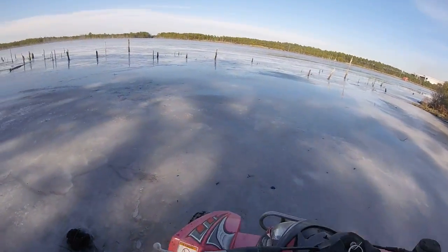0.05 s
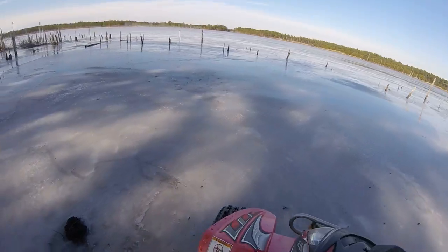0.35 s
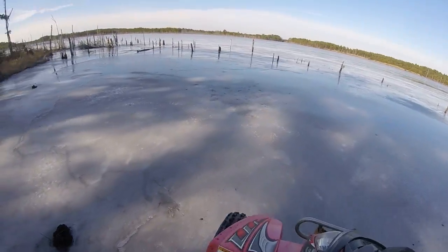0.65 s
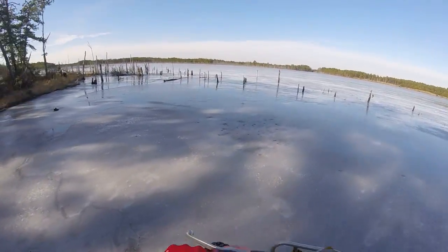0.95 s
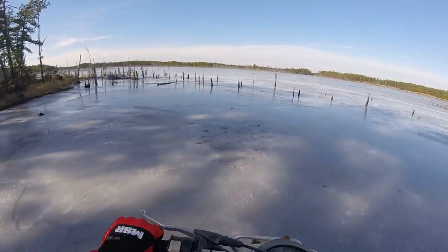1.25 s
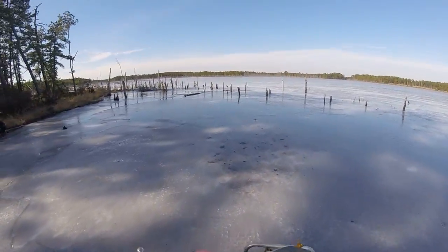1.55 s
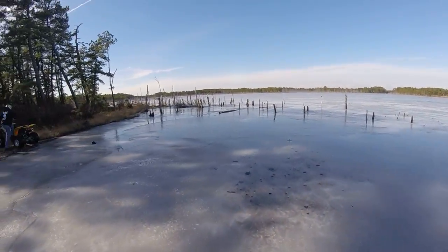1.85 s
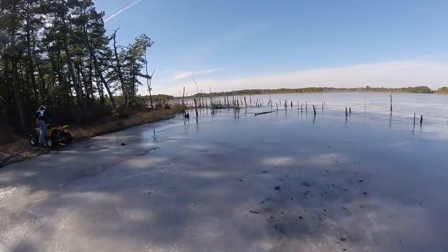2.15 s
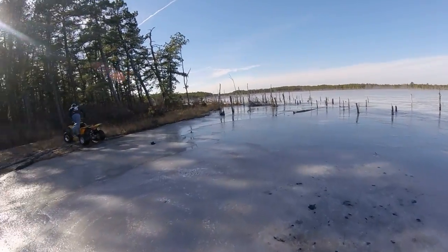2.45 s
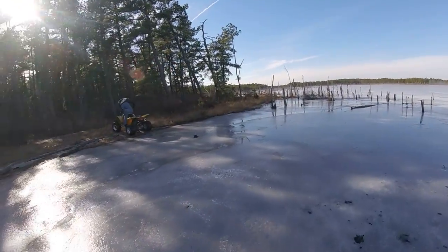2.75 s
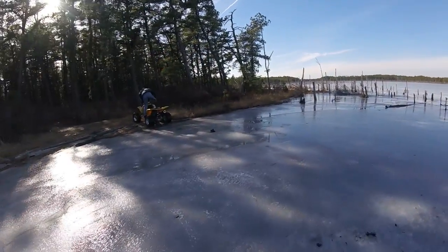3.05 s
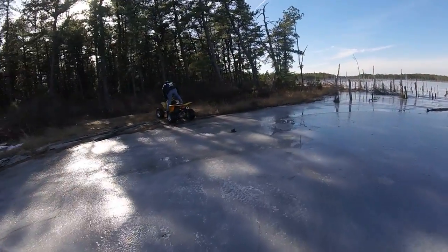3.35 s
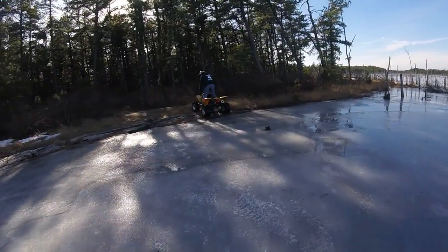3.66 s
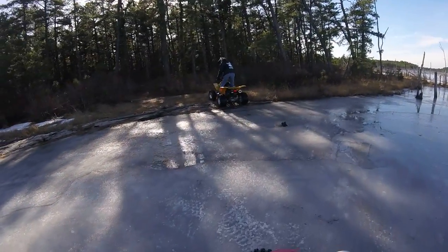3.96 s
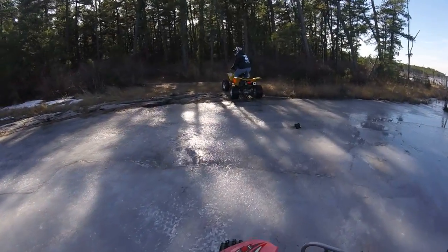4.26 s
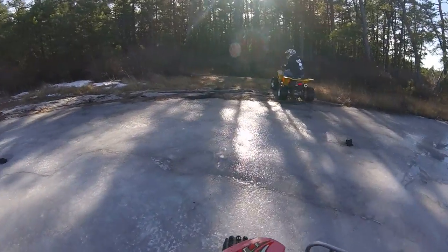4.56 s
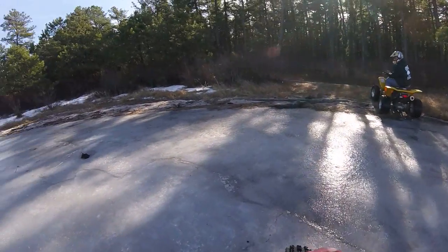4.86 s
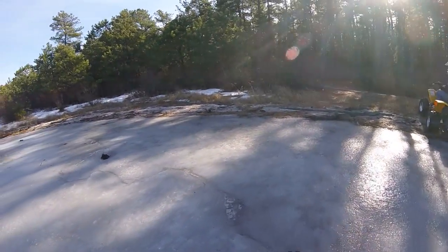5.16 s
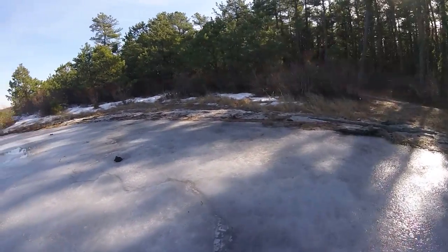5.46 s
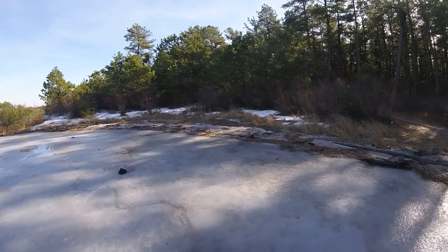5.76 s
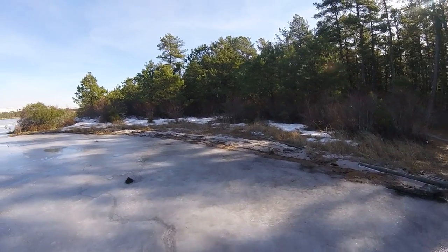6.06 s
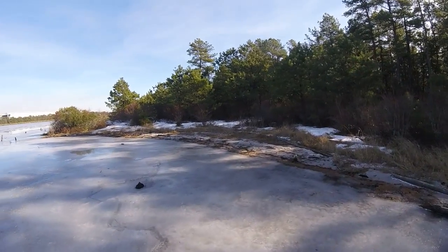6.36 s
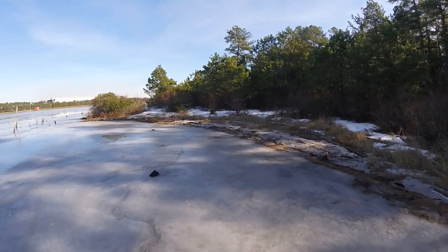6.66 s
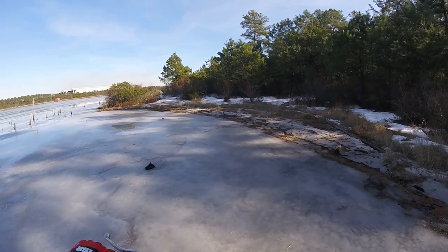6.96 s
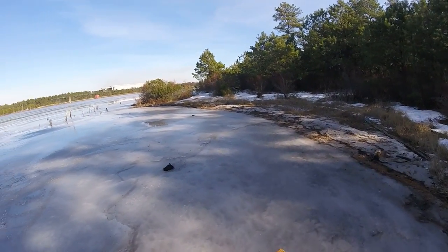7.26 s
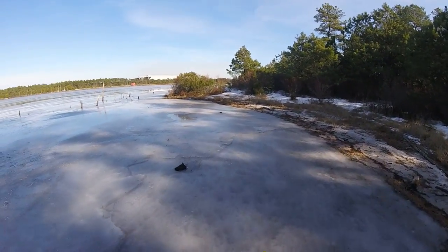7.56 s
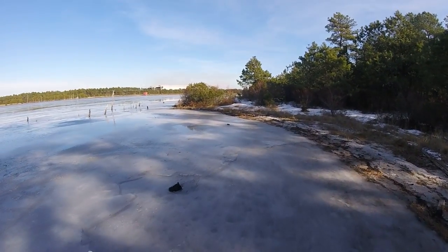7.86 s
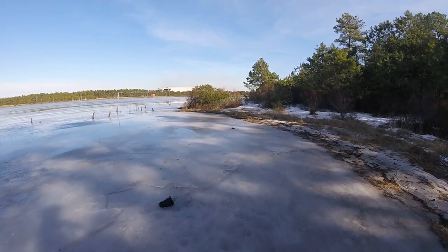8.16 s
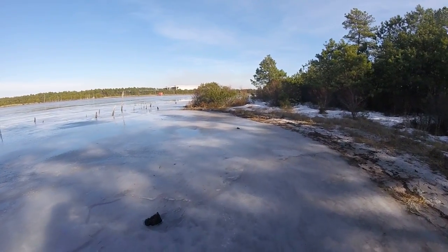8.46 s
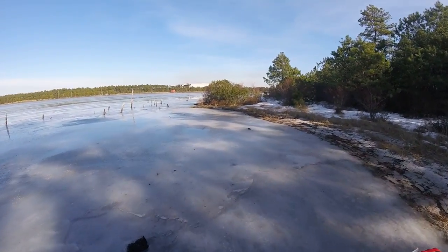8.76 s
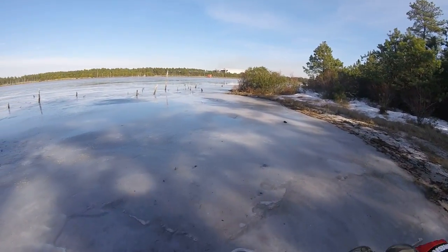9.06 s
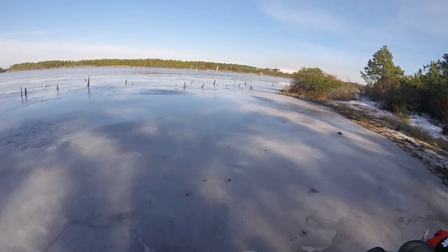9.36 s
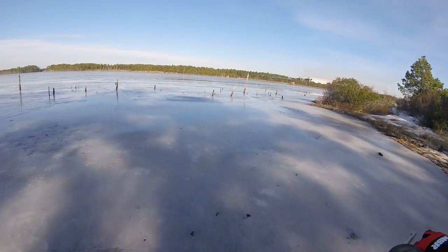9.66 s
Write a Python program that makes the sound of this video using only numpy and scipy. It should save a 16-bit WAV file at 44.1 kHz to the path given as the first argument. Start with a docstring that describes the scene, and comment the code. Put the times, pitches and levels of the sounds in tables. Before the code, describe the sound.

A quad bike's chugging engine revs up twice and drops back to idle as its tyres crunch over ice.

```python
"""On a frozen lake, a quad bike rolls along, heard from the rider's seat.
Its one-cylinder, four-stroke engine revs up twice and drops back to a chugging idle. Each firing
sends a thump of gas through the airbox and exhaust pipe, with a rush, a thin hiss and clattering
valves; an open throttle adds a growl. Below, the tyres crunch and rumble over the ice,
with a few sharp ticks and dull bumps."""
import sys
import numpy as np
from scipy import signal
from scipy.fft import rfft, irfft, next_fast_len
from scipy.io import wavfile
from scipy.ndimage import uniform_filter1d, minimum_filter1d, map_coordinates

SR = 44100
rng = np.random.default_rng(int(sys.argv[2]) if len(sys.argv) > 2 else 0)


def digitize_waveform(pressure):
    """Quantize a signal to 16-bit integers and store it at the path in sys.argv[1].

    Rows of a 2-D input are taken as channels; values are limited to [-1, 1].
    """
    field = np.atleast_2d(pressure).T
    bounded = np.clip(field, -1, 1)
    quanta = np.round(bounded * 32767).astype(np.int16)
    wavfile.write(sys.argv[1], SR, quanta)


N = 437472
T = np.arange(N) / SR

# how often the engine fires: t/s, f/Hz
FIRING_RATE = [(0.0, 18.352), (0.228, 19.558), (0.442, 23.148), (0.884, 22.525), (1.289, 19.891),
               (1.738, 15.033), (2.41, 15.304), (2.691, 14.811), (3.042, 15.434), (3.427, 15.021),
               (4.083, 15.467), (4.64, 16.664), (5.114, 16.167), (5.571, 18.937), (5.88, 23.404),
               (6.624, 22.108), (7.054, 14.007), (7.472, 15.443), (8.448, 14.649), (9.92, 15.133)]
# throttle pushes: t/s at the top of the push, rise/s, hold/s, fall/s, opening/0-1, extra hiss/dB
THROTTLE_PUSHES = [(0.406, 0.87, .45, 0.73, 0.91, 3.5), (4.605, 0.51, 0.12, .5, 0.02, 5),
                   (5.772, 0.46, .75, 0.26, 0.6, 5), (9.55, 0.64, .1, .4, 0, 1)]
# moments of weaker firing: t/s, half-length/s, change/dB
WEAK_FIRINGS = [(5.1, 0.13, -1), (6.72, 0.12, -2), (6.92, 0.035, -5.5), (7.132, 0.095, -2.7)]
# notes the airbox and pipe ring at: f/Hz, width/Hz, idle level/dB, open-throttle level/dB, sign
PIPE_NOTES = [(56.3, 30.7, -28.5, -30, -1), (78.7, 66, -28.5, -30, 1), (117.1, 18.9, -27, -24, -1),
              (126.4, 6.5, -45, -29.5, 1), (229.2, 98, -34, -35.5, -1), (290.2, 41.4, -25, -22.5, 1),
              (337, 22.2, -36, -25.5, -1), (386.5, 35, -50.5, -42.5, -1), (486, 30, -50.5, -42.5, 1),
              (541.3, 21, -48, -37.5, -1), (673, 16, -42, -42, 1), (749.6, 21, -37, -31.5, -1),
              (880, 57, -45.5, -43, 1)]
# strongest notes of the engine's metal casing: f/Hz, width/Hz, level/dB
CASING_NOTES = [(551, 23, -5), (699, 49, -3), (778, 25, -1.5), (914, 35, 0), (1030, 39, -2), (1147, 35, 1),
                (1437, 60, 1.5), (1660, 40, 0.5), (1790, 19, 0.5), (1963, 54, 4.5), (2370, 27, 3.5),
                (2776, 130, -4.5), (3354, 69, 0), (4670, 200, -4)]
# knocks of the valve gear and piston: place/cycles, relative size
KNOCKS = [(-.18, .9), (.03, 1), (.24, .8), (.45, .6), (.64, .5)]
# how rough the ice is under the wheels: t/s, rumble level/dB, crunch level/dB
ICE_ROUGHNESS = [(0, -37.5, -32.5), (1.1, -40, -32.5), (2, -34, -38.5), (3.6, -33, -36.5), (5.15, -31, -34),
                 (6.8, -31, -36), (7.3, -37.5, -35.5), (8.5, -38, -36.5), (9.4, -39, -33.5)]
# snaps from the ice and the frame: t/s, level/dB
TICK_TIMES = [(2.9418, -31.5), (3.089, -34), (3.1397, -44), (3.284, -44), (3.6896, -36), (8.302, -34),
              (8.9294, -30), (9.7947, -38.5)]
# jolts from ridges in the ice: t/s, thud level/dB, crunch level/dB
JOLTS = [(4.27, -23, -27), (4.925, -14, -40), (5.36, -27, -42.5), (6.602, -30, -41)]

# The tone of each sound, from low to high: f/Hz, relative level/dB
GAS_TONE = [(100, -12.5), (250, 12), (420, -1), (560, 0.5), (640, -1), (780, 4), (900, 0), (1020, -7.5),
            (1150, -5.5), (1500, -12), (2500, -17), (6000, -66)]  # swirling gas
GROWL_TONE = [(250, -19.5), (420, 5.5), (560, 6.5), (760, 4.5), (930, -1), (1090, 3), (1270, -11.5),
              (1460, -4), (1650, -9.5), (1960, -3.5), (2150, -11.5), (2370, -4), (2650, -15.5), (4000, -25),
              (9000, -60.5)]  # gas tearing past the valve
FIZZ_TONE = [(2000, -35), (4500, -7.5), (5900, -9), (6800, 1), (8000, -7), (9500, -14.5), (11500, -24.5),
             (14000, -42)]  # air sucked into the engine
RATTLE_TONE = [(300, 1), (700, 3.5), (1300, -1.5), (1800, 1.5), (2200, -9), (2900, -13), (3350, -9),
               (3900, -15.5), (4700, -11), (5950, -19), (7200, -20.5), (9000, -34.5), (11500, -64),
               (14000, -46.5)]  # chain and piston
CASING_TONE = [(350, -25.5), (550, -3.5), (750, 7.5), (950, -3.5), (1130, 1), (1400, -6.5), (1800, -2),
               (2200, -19.5), (2800, -13.5), (3400, -19), (4600, -24.5), (9000, -57)]  # the knocked casing
TYRE_TONE = [(150, 9), (500, 3), (1100, -3.5), (1900, -14), (2300, -9), (4000, -14.5), (5000, -17.5),
             (6000, -30), (7300, -22.5), (9500, -33), (12000, -63)]  # frost being crushed
RUMBLE_TONE = [(15, -21), (35, -5.5), (65, -1.5), (110, 0), (160, -6), (300, -4.5), (450, -13),
               (900, -40.5), (4000, -120)]  # wheels and air
TICK_TONE = [(500, -9), (1200, 5), (1900, -0.5), (2300, 2.5), (2700, -1), (3200, -2), (3700, -14),
             (7000, -9.5), (10000, -35), (14000, -60.5)]  # snapping ice and frame
BUMP_TONE = [(200, -11), (500, 1.5), (950, 2.5), (1400, -2), (1900, -3.5), (2500, -14.5), (4500, -23),
             (9000, -50)]  # the crunch of a ridge


def amp(db):
    """Turn decibels into a number to multiply by."""
    return 10 ** (np.asarray(db) / 20)


def unit(x):
    """Scale a sound to an average strength (rms) of 1."""
    return x / np.sqrt(np.mean(x ** 2) + 1e-20)


def curves(rows):
    """Join a table's points in time: one curve for each column after the first."""
    times, *columns = np.transpose(rows)
    return [np.interp(T, times, column) for column in columns]


def white():
    """Fresh white noise."""
    return rng.standard_normal(N)


def wobble(rate):
    """A smooth curve through `rate` random points a second."""
    points = rng.standard_normal(int(N * rate / SR) + 4)
    steps = np.arange(0, len(points) - 1, 1 / 10)
    return np.interp(T * rate, steps, map_coordinates(points, [steps]))


def filtered(x, response):
    """Turn each frequency f in x up or down by response(f)."""
    size = next_fast_len(N + SR // 2)
    return irfft(rfft(x, size) * response(np.fft.rfftfreq(size, 1 / SR)), size)[:N]


def coloured(x, tone):
    """Shape x with a tone table and scale it to strength 1."""
    hz, db = np.transpose(tone)
    return unit(filtered(x, lambda f: amp(np.interp(np.log(f + 1), np.log(hz), db))))


def resonance(f, hz, width):
    """How something that rings at `hz` answers frequency f."""
    return 1j * f * width / (hz * hz - f * f + 1j * f * width)


def fading(start, rise, life):
    """A quick rise, then a slower fade; all times in seconds."""
    age = np.maximum(T - start, 0)
    return (1 - np.exp(-age / rise)) * np.exp(-age / life)


def swell(at, width):
    """One smooth hump of height 1; time and width in seconds."""
    return np.exp(-.5 * ((T - at) / width) ** 2)


def hump(cycle, at, width):
    """A hump of height 1 in every engine cycle; place and width in cycles."""
    distance = (cycle - at + .5) % 1 - .5
    return np.exp(-.5 * (distance / width) ** 2)


def puff(cycle, at, width):
    """A hump of area 1: a shorter puff is taller."""
    return hump(cycle, at, width) / (width * np.sqrt(2 * np.pi))


def strike(cycle, at):
    """One click each time the engine passes a place in its cycle."""
    turns = np.floor(cycle - at)
    return np.diff(turns, prepend=turns[0])


def engine_cycles(firing_hz):
    """Count the cycles so far, a little uneven from one firing to the next."""
    return .161 + np.cumsum(firing_hz) / SR + .0015 * wobble(15)


def throttle_opening():
    """The thumb opens the throttle, holds it and lets it spring back: 0 is idle, 1 is wide open."""
    total = 0
    for at, rise, hold, fall, opening, _ in THROTTLE_PUSHES:
        press, release = 1 + (T - at) / rise, 1 - (T - at - hold) / fall
        total += opening * np.clip(np.minimum(press, release), 0, 1)
    return np.clip(total, 0, 1)


def pipe_ring(f, throttle, stretch):
    """How the airbox and pipe ring at one throttle opening; `stretch` raises all their notes."""
    return sum(np.sign(sign) * amp(idle_db + throttle * (open_db - idle_db))
               * resonance(f, hz * stretch, width) for hz, width, idle_db, open_db, sign in PIPE_NOTES)


def thump(cycle, firing_hz, throttle):
    """A valve snaps open and a broad gulp of gas follows; both set the airbox and pipe ringing."""
    fill = 1 - np.exp(-throttle / .063)  # a little throttle already fills out the pulses
    dips_db = sum(db * swell(at, width) for at, width, db in WEAK_FIRINGS)
    strength_db = -1 + 3 * fill + dips_db
    snap_width = .00039 * firing_hz  # 0.39 ms at any engine speed
    gulp = 1.77 * puff(cycle, .202, .054) * amp(.3 * wobble(17))
    snaps = puff(cycle, 0, snap_width) + .29 * puff(cycle, .108, snap_width)
    flow = (snaps + gulp) * amp(strength_db + .2 * wobble(15))
    opened = throttle ** 1.5  # the ringing changes most near full throttle
    idling = filtered(flow * (1 - opened), lambda f: pipe_ring(f, throttle=0, stretch=1))
    pulling = filtered(flow * opened, lambda f: pipe_ring(f, throttle=.95, stretch=1.052))
    return idling + pulling * amp(opened - 1)  # the pull is up to 1 dB softer at part throttle


def gas_rush(cycle, level_db):
    """Swirling gas swells with each pulse, then dies down."""
    surge = .5 + .75 * hump(cycle, .09, .1) + .3 * hump(cycle, .38, .09)
    return amp(level_db) * coloured(surge * white(), GAS_TONE)


def growl(cycle, throttle, full_db):
    """With the throttle open, gas tears past the valve; the same rasp each cycle makes a growl."""
    rasp = white() * fading(0, .005, .018)
    rasps = signal.fftconvolve(strike(cycle, 0), rasp[:SR // 10])[:N]
    return amp(full_db) * throttle * coloured(rasps, GROWL_TONE)


def intake_hiss(cycle, base_db):
    """Air sucked past the throttle sings high over a soft fizz, most as the valve opens."""
    level_db = base_db + sum(db * swell(at, .3) for at, *_, db in THROTTLE_PUSHES)
    suction = .5 + hump(cycle, .012, .06) * amp(2.5 * wobble(42))
    whistle = filtered(suction * white(), lambda f: resonance(f, 6506, 170) * resonance(f, 6700, 800))
    fizz = coloured((1 + suction) * white(), FIZZ_TONE)
    return amp(level_db) * unit(whistle) + amp(level_db - 5) * fizz


def chain_rattle(cycle, level_db):
    """The chain and piston rattle all through the cycle, loudest as the valves move."""
    accents = 1 + .4 * hump(cycle, .07, .2) + .35 * hump(cycle, -.15, .03)
    flicker = amp(1.9 * wobble(130))
    return amp(level_db) * coloured(accents * flicker * white(), RATTLE_TONE)


def valve_clatter(cycle, level_db):
    """The valve gear and piston knock at set places in the cycle, ringing the metal casing."""
    knocks = sum(size * strike(cycle, at) for at, size in KNOCKS) * amp(wobble(40))
    ring = white() * fading(0, .002, .014)  # the casing's many weaker notes blur into noise
    blur = signal.fftconvolve(knocks, ring[:SR // 10])[:N]
    notes = filtered(knocks, lambda f: sum((-1) ** k * amp(db) * resonance(f, hz, width)
                                           for k, (hz, width, db) in enumerate(CASING_NOTES)))
    return amp(level_db) * coloured(unit(notes) + amp(2) * unit(blur), CASING_TONE)


def tyre_crunch(level_db, grains_per_s=8000):
    """Knobbly tyres crush the frost in many tiny grains."""
    grains = white() * (rng.random(N) < grains_per_s / SR)
    return amp(level_db + .6 * wobble(13)) * coloured(grains, TYRE_TONE)


def rumble(low_noise, level_db):
    """The wheels and the passing air make a low, uneven rumble."""
    return amp(level_db + 2.6 * wobble(8)) * low_noise


def ticks():
    """The ice and the bike's frame give short, dry snaps."""
    bursts = sum(amp(db) * fading(at, .00014, .0079) for at, db in TICK_TIMES)
    return bursts * coloured(white(), TICK_TONE)


def bumps(low_noise):
    """Ridges in the ice jolt the frame with a dull thud and a longer crunch."""
    thuds = sum(amp(db) * fading(at, .004, .02) for at, db, _ in JOLTS)
    crunches = sum(amp(db) * fading(at, .02, .13) for at, _, db in JOLTS)
    return thuds * low_noise + crunches * coloured(white(), BUMP_TONE)


def scene():
    """Mix the engine, which follows its speed and throttle, with the sounds of the ride."""
    firing_hz, = curves(FIRING_RATE)
    rumble_db, crunch_db = curves(ICE_ROUGHNESS)
    cycle, throttle = engine_cycles(firing_hz), throttle_opening()
    gas = thump(cycle, firing_hz, throttle)
    gas += gas_rush(cycle, level_db=-35.5 + 3 * throttle)
    gas += growl(cycle, throttle, full_db=-33.5)
    hiss = intake_hiss(cycle, base_db=-54)
    # metal parts shake more as the engine speeds up, and on rough ice
    idle_hz = 14.85
    shake_db = 2.5 * np.log2(firing_hz / idle_hz) + .33 * (crunch_db - crunch_db.mean())
    metal = chain_rattle(cycle, -38.5 + shake_db) + valve_clatter(cycle, -42 + shake_db)
    low_noise = coloured(white(), RUMBLE_TONE)
    ride = tyre_crunch(crunch_db) + rumble(low_noise, rumble_db) + ticks() + bumps(low_noise)
    return (gas + hiss + metal + ride)[None]


def record(dry):
    """Gently turn down the tallest peaks and cut off the very highest treble."""
    ceiling, top_hz = .53, 14100
    needed = ceiling / np.maximum(np.abs(dry[0]), ceiling)
    gain = uniform_filter1d(minimum_filter1d(needed, size=800), size=400)
    return filtered(dry[0] * gain, lambda f: f < top_hz)[None]


dry = scene()
out = record(dry)
digitize_waveform(out)
```